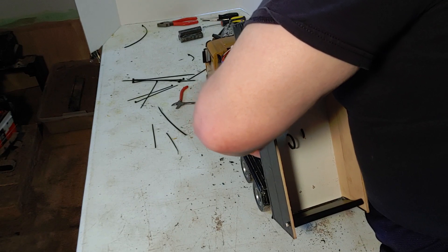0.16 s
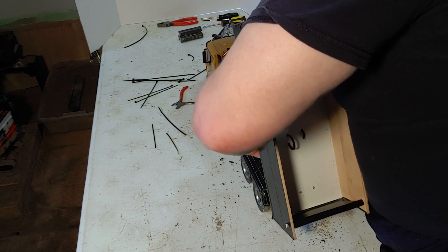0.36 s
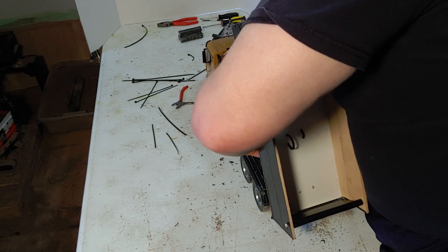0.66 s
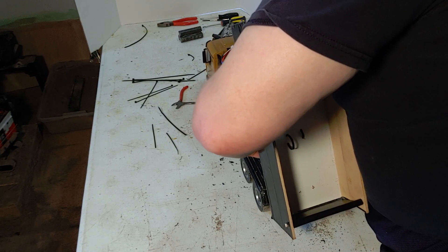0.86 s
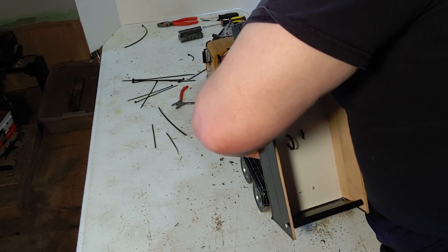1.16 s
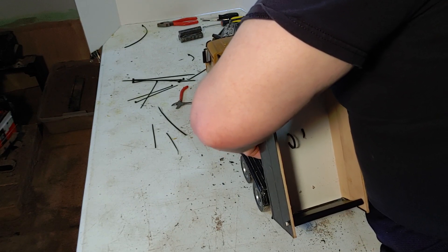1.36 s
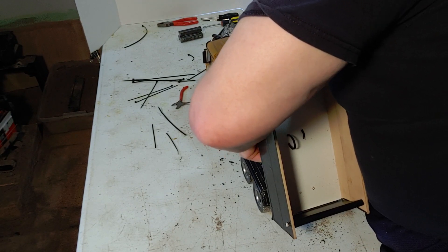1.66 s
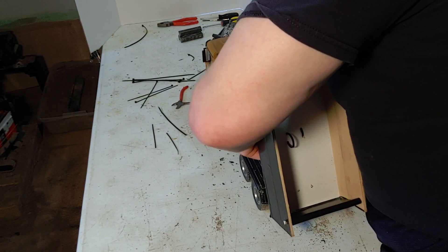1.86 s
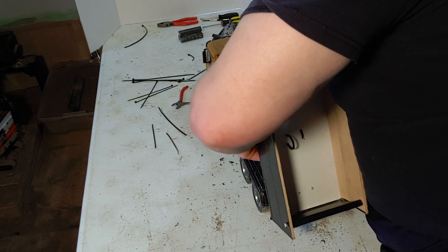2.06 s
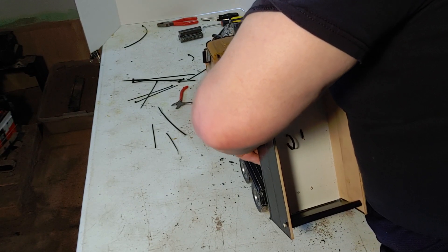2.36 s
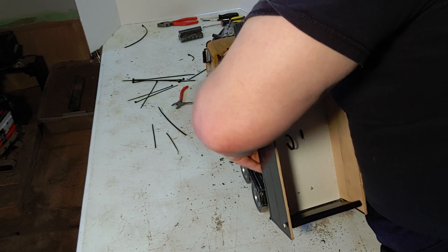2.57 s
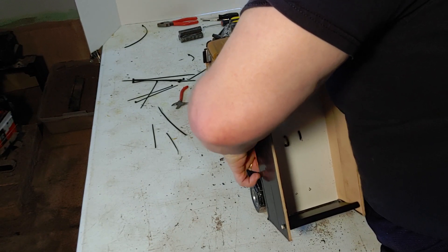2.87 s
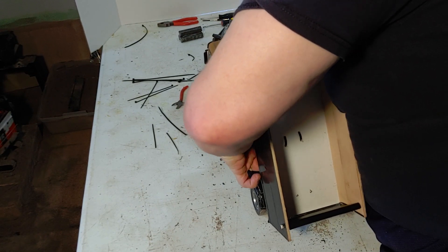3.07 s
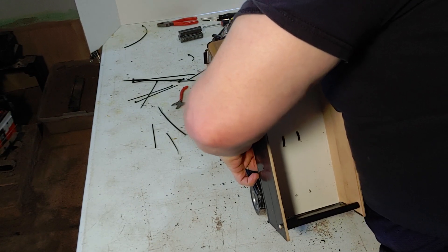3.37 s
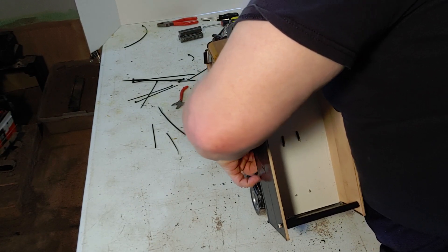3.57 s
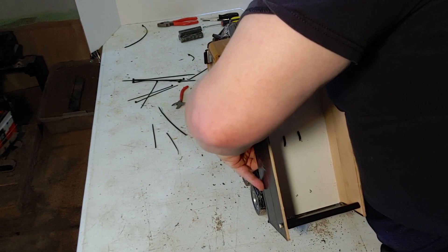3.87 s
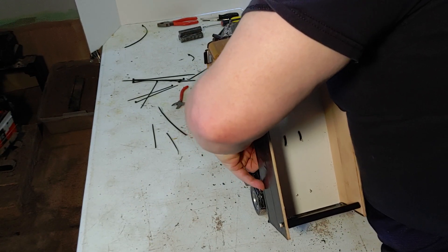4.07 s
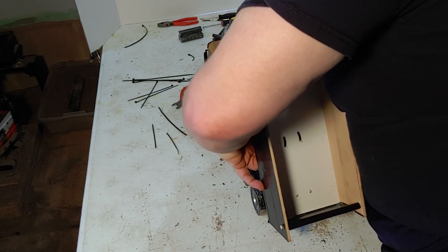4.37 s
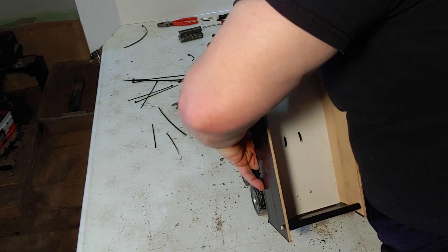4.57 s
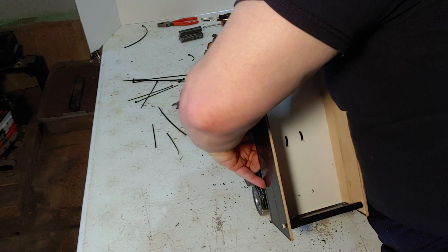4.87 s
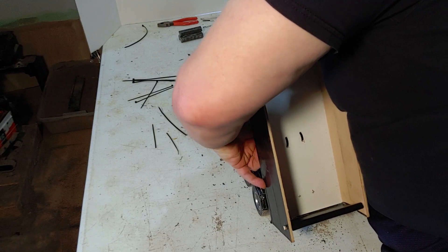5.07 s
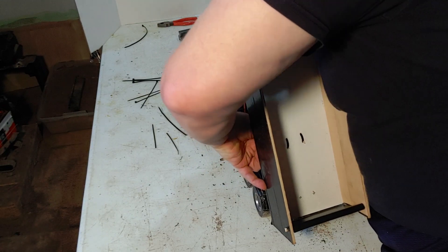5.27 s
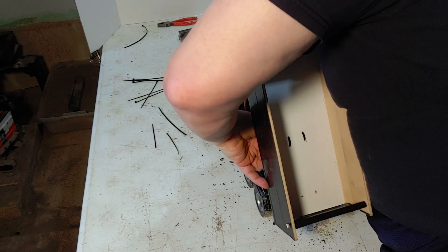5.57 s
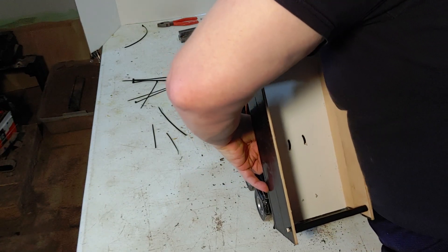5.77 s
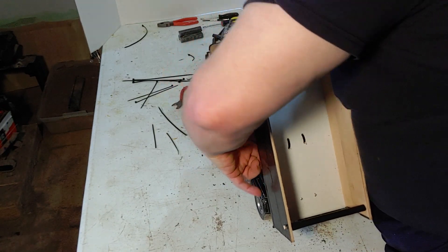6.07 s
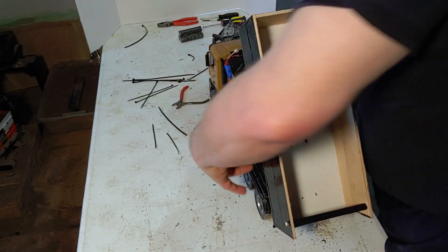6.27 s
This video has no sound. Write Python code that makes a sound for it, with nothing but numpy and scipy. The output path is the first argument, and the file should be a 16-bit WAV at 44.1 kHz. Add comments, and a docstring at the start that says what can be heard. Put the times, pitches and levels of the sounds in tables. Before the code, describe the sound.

Right at the start a nylon zip tie is yanked tight with a very short, bright zip, followed by two sharp plastic clicks. More clicks at about 0.8 seconds lead into a slower, hissing pull that ratchets tooth by tooth until 1.25 seconds. Plastic toy truck parts click and knock from 1.4 to 1.8 seconds, then fingers rub faintly. At about 2.9 seconds a second fast yank ends in a brief, rough squeak that rises and falls, with a soft thump from the workbench. After that there is only handling: a cluster of clicks and a scrape around 3.7 seconds, light knocks between 4.2 and 5 seconds, another small rattle near 5.4 seconds and a faint tick at 6 seconds. Everything sounds close and crisp, in a small, quiet room with little echo.

```python
"""A fast zip: a nylon tie is yanked tight on a toy truck on a workbench, its pawl snapping over the teeth.
A slow, hissing pull follows, then a second yank that ends in a stick-slip squeak.
Throughout, plastic parts click, fingers rub and the bench top thumps softly.
A small room answers; the microphone ports ring in the treble and a limiter holds the peaks."""
import sys
import numpy as np
from scipy import signal
from scipy.fft import rfft, irfft, next_fast_len
from scipy.io import wavfile
from scipy.ndimage import uniform_filter1d, minimum_filter1d, map_coordinates

SR = 44100
rng = np.random.default_rng(int(sys.argv[2]) if len(sys.argv) > 2 else 0)


def store_wav(level_fs):
    """Save 16-bit WAV to argv[1]."""
    pcm = np.round(np.clip(np.atleast_2d(level_fs), -1, 1) * 32767)
    wavfile.write(sys.argv[1], SR, pcm.T.astype(np.int16))


N = 282681

# two yanks, each a list of (time [s], speed [teeth/s], tooth level [dB])
YANKS = [
    [(0, 305, -16.5), (.02, 320, -14), (.04, 330, -21.5), (.075, 205, -27.5)],
    [(2.855, 222, -13.5), (2.88, 260, -15.5), (2.9, 344, -24.5), (2.93, 450, -24), (2.957, 400, -26.5),
     (2.975, 250, -41), (3.01, 130, -40)],
]
# truck body modes (frequency [Hz], width [Hz], gain [dB])
TRUCK_MODES = [(457, 27, 2.5), (532, 130, 2.5), (700, 120, -3), (846, 70, -4), (933, 28, -4),
               (1407, 270, -4.5), (1687, 220, -4), (2086, 230, -4.5), (2820, 140, -6.5), (3700, 220, -9.5)]
# truck shifts its weight on the bench (middle [s], length [s], sway [dB], thud [dB])
LOAD_SHIFTS = [(0.02, .1, -71, -47.5), (.35, 0.18, -57, -66.5), (1.09, 0.17, -85, -50.5),
               (1.23, 0.19, -55, -62.5), (1.96, 0.27, -63, -65.5), (2.96, 0.099, -61.5, -45),
               (3.05, 0.16, -50, -45), (3.84, 0.082, -60.5, -59.5), (4.43, 0.064, -63, -55),
               (4.76, .11, -47, -55), (4.95, 0.11, -60.5, -70), (5.44, 0.14, -62, -48),
               (5.58, 0.12, -53, -70), (5.79, 0.1, -63.5, -53.5), (6.09, 0.24, -65.5, -69.5)]
# plastic parts click and knock (time [s], snap [dB], body [dB])
PART_CLICKS = [(0.109, -12.5, -26), (0.236, -11, -23), (0.6585, -55, -40), (0.8022, -33, -34),
               (0.8135, -17.5, -30.5), (0.875, -15, -32), (1.3853, -21.5, -20), (1.513, -22, -30),
               (1.6878, -24, -25.5), (1.7132, -21.5, -22), (1.7377, -20.5, -30.5), (1.7637, -19.5, -25),
               (1.817, -45, -31.5), (2.1042, -27, -50), (2.281, -42.5, -60), (3.6182, -40.5, -60),
               (3.647, -44.5, -68), (3.712, -29.5, -42.5), (3.7531, -20, -24.5), (3.8, -20.5, -30),
               (3.82, -47, -39), (4.1741, -58, -29.5), (4.242, -48, -52.5), (4.398, -93, -50),
               (4.693, -69.5, -42.5), (4.835, -55, -38), (4.9188, -61, -38), (4.987, -65, -44),
               (5.085, -71, -56), (5.3511, -29.5, -27.5), (5.3704, -34, -29), (5.3874, -30, -29),
               (5.6373, -42.5, -61), (5.9989, -34.5, -47), (6.375, -49.5, -71)]
# fingers and straps rub the parts (middle [s], length [s], scratch [dB], body [dB])
RUB_STROKES = [(0.4, 0.035, -61.5, -60.5), (0.48, 0.025, -61, -66), (0.555, 0.06, -70.5, -67),
               (0.795, 0.02, -56.5, -66), (1.1, 0.11, -39, -36.5), (1.98, 0.17, -65, -54.5),
               (2.115, 0.098, -49, -65.5), (2.275, 0.065, -56.5, -65.5), (2.335, 0.041, -50.5, -61.5),
               (2.426, 0.03, -65.5, -84), (2.55, 0.11, -58.5, -67), (2.65, 0.031, -73, -56.5),
               (2.76, 0.098, -64.5, -71.5), (2.85, 0.014, -47.5, -43), (3.05, 0.17, -68, -50),
               (3.467, 0.043, -74, -56.5), (3.58, 0.15, -68.5, -74.5), (3.728, 0.054, -42.5, -46.5),
               (4.0, 0.18, -69, -64.5), (4.109, 0.056, -48.5, -60.5), (4.253, 0.028, -64.5, -49),
               (4.8, 0.068, -61, -51), (4.89, 0.079, -52.5, -53.5), (5.298, 0.041, -75.5, -55),
               (5.373, 0.069, -40, -37), (5.59, 0.086, -63, -69), (5.767, 0.084, -57.5, -58),
               (6.02, 0.077, -46.5, -56), (6.37, 0.07, -66, -77.5)]
# slow pull, speeding up, then labouring (time [s], speed [teeth/s], tooth level [dB])
SLOW_TEETH = [(.913, 95, -19), (.95, 65, -18), (1.019, 126, -17.5), (1.033, 226, -17), (1.057, 97, -16),
              (1.089, 106, -14.5), (1.176, 41, -15), (1.219, 78, -17), (1.24, 20, -12)]
# strap squeaks as it bites (time [s], pitch [Hz], level [dB])
SQUEAK_TRACK = [(2.88, 320, -32.5), (2.897, 455.6, -10.5), (2.908, 486.4, -17.5), (2.925, 889.4, -14.5),
                (2.941, 1048, -24.5), (2.953, 893, -20), (2.977, 793.6, -34.5), (2.985, 483.5, -20.5),
                (3.01, 389, -34.5)]
# source spectra (frequency [Hz], density [dB])
PAWL_SPECTRUM = [(150, -52.5), (500, -25.5), (1200, -21.5), (2000, -11.5), (3500, -7), (5300, -1),
                 (7000, 4), (9000, -0.5), (11000, -10.5), (13000, -11.5), (16000, -14.5)]
SWAY_SPECTRUM = [(15, -17.5), (28, -10.5), (40, -14), (54, -2), (64, -7.5), (80, -17.5), (150, -29),
                 (400, -74.5), (2000, -120)]
THUD_SPECTRUM = [(60, -34), (95, -22), (130, -5), (175, 6), (230, 1), (290, -7.5), (450, -23.5),
                 (1500, -59.5), (5000, -110)]
SNAP_SPECTRUM = [(150, -53.5), (500, -24), (1200, -18.5), (2000, -10), (3500, -5), (5300, -1), (7000, 2.5),
                 (9000, -4.5), (11000, -13.5), (13000, -25.5), (16000, -34.5)]
SCRATCH_SPECTRUM = [(200, -47.5), (600, -21.5), (1300, -14.5), (2100, -9), (2800, -3.5), (4000, -3),
                    (6000, 1.5), (8000, 0.5), (10000, -11), (12000, -23), (16000, -41)]
DRAG_SPECTRUM = [(300, -37), (1200, -15.5), (2000, -6.5), (3500, -11), (5500, -5), (8000, 1), (11000, 4.5),
                 (13000, 1.5), (16000, -9.5)]
AIR_SPECTRUM = [(20, -0.5), (60, -2.5), (150, -11.5), (500, -17), (2000, -24.5), (8000, -31),
                (16000, -40.5)]
# room decay (frequency [Hz], t60 [s])
ROOM_T60 = [(100, 0.047), (220, 0.11), (530, 0.19), (1500, 0.21), (4000, 0.19), (8000, 0.17),
            (14000, 0.076)]
# left-right likeness of reflections (frequency [Hz], correlation [-])
STEREO_CORRELATION = [(100, 0.47), (700, 0.83), (1200, 0.21), (3000, 0.7), (7000, 0.029)]
# microphone port resonance, left and right (frequency [Hz], width [Hz], boost [dB])
MIC_PORTS = [(7840, 620, 14), (7510, 850, 12.5)]


def amp(db):
    return 10 ** (np.asarray(db) / 20)


def unit(x):
    return x / np.sqrt(np.mean(x ** 2) + 1e-20)


def along(points, hz):
    """(Hz, value) points on a log axis."""
    f, v = np.transpose(points)
    return np.interp(np.log(hz + 1), np.log(f + 1), v)


def gated_curves(rows):
    """A gate over the rows' time span, then each column per sample."""
    times_s, *columns = np.transpose(rows)
    t = np.arange(N) / SR
    gate = (t >= times_s[0]) & (t <= times_s[-1])
    return [gate] + [np.interp(t, times_s, column) for column in columns]


def stroke_gains(rows, edge):
    """Strokes rise and fade about their middles: one gain curve per level column."""
    t = np.arange(0, N, 100) / SR
    middle_s, length_s, *levels_db = np.transpose(rows)[:, :, None]
    shape = np.exp(-np.minimum(np.abs(2 * (t - middle_s) / length_s) ** edge, 20))
    return [np.interp(np.arange(N) / SR, t, np.linalg.norm(shape * amp(db), axis=0)) for db in levels_db]


def fft_filtered(x, response):
    n = x.shape[-1]
    size = next_fast_len(n + n // 4)
    return irfft(rfft(x, size) * response(np.fft.rfftfreq(size, 1 / SR)), size)[..., :n]


def convolved(x, response, size=4096):
    impulse = irfft(response(np.fft.rfftfreq(size, 1 / SR))).ravel()
    return signal.oaconvolve(x, impulse)[:N]


def causal_response(spectrum, size=2048):
    """Minimum-phase response with this spectrum."""
    grid_hz = np.fft.rfftfreq(size, 1 / SR)
    cepstrum = irfft(np.log(amp(along(spectrum, grid_hz))))
    phase = rfft(2 * cepstrum[:size // 2], size).imag
    return lambda hz: amp(along(spectrum, hz)) * np.exp(1j * np.interp(hz, grid_hz, phase))


def spectrum_noise(spectrum, size=8192):
    return unit(convolved(rng.standard_normal(N), causal_response(spectrum, size), size))


def impacts(times_s, levels_db, response, t60_s, crackle=0.2, size=2048):
    """Impulse plus short crackle through a response; each has the energy of 4 ms at its level."""
    t = np.arange(size) / SR
    force = (t == 0) + crackle * rng.standard_normal((len(times_s), size)) * amp(-60 * t / t60_s)
    bursts = irfft(rfft(force) * response(np.fft.rfftfreq(size, 1 / SR)))
    bursts *= np.sqrt(.004 * SR) / np.linalg.norm(bursts, axis=1, keepdims=True)
    at = np.round(np.maximum(times_s, 0) * SR).astype(int)[:, None] + np.arange(size)
    return np.bincount(at.ravel(), (bursts * amp(levels_db)[:, None]).ravel(), N)[:N]


def truck(hz, contacts=1, vary_db=2, vary_pitch=0.035, low_hz=440, top_hz=6000):
    """Body response; each contact point excites the modes a little differently."""
    chance = rng.standard_normal((contacts, len(TRUCK_MODES), 2))
    peak = lambda f0, width: 1j * hz * width / (f0 ** 2 - hz ** 2 + 1j * hz * width)
    modes = 0
    for k, (centre_hz, width_hz, db) in enumerate(TRUCK_MODES):
        mode_hz = centre_hz * (1 + vary_pitch * chance[:, k, 1:])
        modes += amp(db + vary_db * chance[:, k, :1]) * peak(mode_hz, width_hz)
    bass_cut = peak(low_hz, low_hz) * 1j * hz / low_hz  # too small to radiate bass
    return modes * bass_cut / (1 + 1j * hz / top_hz) ** 3  # too heavy to follow treble


def ratchet(pull, jitter_s, scatter_db, body_db):
    """Teeth pass at strap speed; each snaps the pawl and shakes the truck."""
    gate, teeth_per_s, tooth_db = gated_curves(pull)
    teeth_passed = np.ceil(np.cumsum(gate * teeth_per_s) / SR)
    at = np.flatnonzero(np.diff(teeth_passed, prepend=0))
    chance = rng.standard_normal((len(at), 2))
    times_s = at / SR + jitter_s * chance[:, 0]
    levels_db = tooth_db[at] + scatter_db * chance[:, 1]
    pawl = impacts(times_s, levels_db, causal_response(PAWL_SPECTRUM), t60_s=0.0057)
    body = impacts(times_s, levels_db + body_db, lambda hz: truck(hz, contacts=len(at)), t60_s=0.0044)
    return pawl + body


def fast_zips():
    """In a yank the tooth snaps merge into a zip."""
    return sum(ratchet(pull, jitter_s=.0003, scatter_db=3.5, body_db=-12.5) for pull in YANKS)


def bench(knock_db=-28.5, knock_t60_s=0.33):
    """The top sways on its lowest mode and thuds as the load shifts; each knock also thuds it."""
    sway, shift_thud = stroke_gains(LOAD_SHIFTS, edge=1.4)
    times_s, _, body_db = np.transpose(PART_CLICKS)
    blows = np.bincount(np.round(times_s * SR).astype(int), amp(body_db + knock_db) ** 2, N)[:N]
    power_decay = amp(-60 / (knock_t60_s * SR)) ** 2
    knock_power = signal.lfilter([1], [1, -power_decay], blows)
    thud = np.sqrt(shift_thud ** 2 + knock_power)
    return sway * spectrum_noise(SWAY_SPECTRUM) + thud * spectrum_noise(THUD_SPECTRUM)


def part_clicks(rows, ref_reach_hz=3800, ref_snap_db=-33, db_per_octave=18):
    """Plastic contacts snap and knock the body; a harder snap reaches higher modes."""
    times_s, snap_db, body_db = np.transpose(rows)
    reach_hz = ref_reach_hz * 2 ** ((snap_db[:, None] - ref_snap_db) / db_per_octave)
    body = lambda hz: truck(hz, contacts=len(rows), vary_db=3.5, vary_pitch=.05, top_hz=reach_hz)
    snaps = impacts(times_s, snap_db, causal_response(SNAP_SPECTRUM), t60_s=0.012, crackle=0.21)
    knocks = impacts(times_s, body_db, body, t60_s=.008, crackle=0.27)
    return snaps + knocks


def micro_slips(rate_hz, spread_db):
    """Tiny friction impulses, random in time and size."""
    at = np.flatnonzero(rng.random(N) < rate_hz / SR)
    chance = rng.standard_normal((len(at), 2))
    return np.bincount(at, np.sign(chance[:, 0]) * amp(spread_db * np.clip(chance[:, 1], -2, 2)), N)


def rubbing(pressure_db=1.5, pressure_hz=30, catch_db=9, finger_reach_hz=2936):
    """Slips and harder catches under unsteady pressure scratch the surface and murmur in the body."""
    scratch_gain, body_gain = stroke_gains(RUB_STROKES, edge=4.7)
    catches = amp(catch_db) * micro_slips(rate_hz=70, spread_db=1)
    surface = causal_response(SCRATCH_SPECTRUM)
    scratch = unit(convolved(micro_slips(rate_hz=810, spread_db=6) + catches, surface))
    soft_touch = lambda hz: truck(hz, vary_db=1.2, top_hz=finger_reach_hz)
    body = unit(convolved(micro_slips(rate_hz=350, spread_db=4) + catches, soft_touch))
    knots = rng.standard_normal(int(N * pressure_hz / SR) + 4)
    pressure = map_coordinates(knots, [np.arange(N) * pressure_hz / SR])
    return amp(pressure_db * pressure) * (scratch_gain * scratch + body_gain * body)


def contact_drift(x, depth_db, bins=7, frames=9):
    """The colour drifts as the contact point moves."""
    spectra = signal.stft(x, nperseg=512)[2]
    field = uniform_filter1d(rng.standard_normal(spectra.shape), bins, axis=0)
    field = unit(uniform_filter1d(field, frames, axis=1))
    return signal.istft(spectra * unit(amp(depth_db * field)), nperseg=512)[1][:N]


def slow_zip(drag_db=-15.5, ref_teeth_per_s=110, db_per_doubling=5):
    """The strap creeps through its head tooth by tooth; harder, faster drag hisses louder."""
    gate, teeth_per_s, tooth_db = gated_curves(SLOW_TEETH)
    hiss_db = tooth_db + drag_db + db_per_doubling * np.log2(teeth_per_s / ref_teeth_per_s)
    hiss = unit(convolved(micro_slips(rate_hz=4300, spread_db=-2.5), causal_response(DRAG_SPECTRUM)))
    teeth = ratchet(SLOW_TEETH, jitter_s=.0002, scatter_db=3, body_db=-18)
    return teeth + gate * amp(hiss_db) * hiss


def squeak(pitch_jitter=.03, peak_db_per_octave=-6, harmonics=6):
    """Nylon sticks and slips under rising tension: a rough tone with falling overtones."""
    gate, pitch_hz, level_db = gated_curves(SQUEAK_TRACK)
    flutter = unit(uniform_filter1d(rng.standard_normal(N), size=90))
    phase = 2 * np.pi * np.cumsum(pitch_hz * (1 + pitch_jitter * flutter)) / SR
    # faster slip: sharper release, stronger overtones
    db_per_octave = peak_db_per_octave / np.sqrt(pitch_hz / pitch_hz.max())
    tone = sum(amp(db_per_octave * np.log2(k)) * np.sin(k * phase) for k in range(1, harmonics + 1))
    return gate * amp(level_db) * tone


def diffuse_pair(n):
    """Left and right noise, partly alike in bass and mids, unrelated in the top treble."""
    angle = lambda hz: np.arccos(np.clip(along(STEREO_CORRELATION, hz), -1, 1)) / 2
    weights = lambda hz: np.array([np.cos(angle(hz)), np.sin(angle(hz))])
    mid, side = fft_filtered(rng.standard_normal((2, n)), weights)
    return np.array([mid + side, mid - side])


def small_room(x, near_db, tail_db, near_t60_s, direct_db=-5, right_lag_samples=3):
    """Direct sound, left port first; near scatter off truck and bench; then the room's tail."""
    n = SR // 3
    t = np.arange(n) / SR
    hz, frame_s, spectra = signal.stft(diffuse_pair(n), SR, nperseg=256)
    decay = amp(-60 * frame_s / along(ROOM_T60, hz)[:, None])
    tail = signal.istft(spectra * decay, SR, nperseg=256)[1][:, :n] * (1 - np.exp(-t / 0.0059))
    near = diffuse_pair(n) * amp(-np.minimum(60 * t / near_t60_s, 200)) * (1 - np.exp(-t / 0.00055))
    scaled = lambda part, db: amp(db) * part / np.linalg.norm(part, axis=1, keepdims=True)
    impulse = scaled(near, near_db) + scaled(tail, tail_db)
    impulse[:, 0] += amp(direct_db)
    left, right = signal.oaconvolve(x[None], impulse, axes=1)[:, :N]
    return np.array([left, np.pad(right, (right_lag_samples, 0))[:N]])


def scene(click_spots=4, pan_db=0.4, air_db=-72):
    """Ties, parts and hands in the room, over bench and air; each click spot has its own reflections."""
    zips = contact_drift(slow_zip(), depth_db=1) + fast_zips()
    ties = small_room(zips + squeak(), near_db=-2, tail_db=-5.5, near_t60_s=0.014)
    spots = (part_clicks(PART_CLICKS[k::click_spots]) for k in range(click_spots))
    parts = sum(small_room(spot, near_db=-2.5, tail_db=-4, near_t60_s=0.026) for spot in spots)
    hands = small_room(contact_drift(rubbing(), depth_db=4), near_db=0, tail_db=-9.5, near_t60_s=0.1)
    air = amp(air_db) * np.array([spectrum_noise(AIR_SPECTRUM), spectrum_noise(AIR_SPECTRUM)])
    return (ties + parts + hands) * amp([[-pan_db], [pan_db]]) + bench() + air


def record(dry, limit_db=-1.5, cutoff_hz=16000):
    """Microphone ports ring, a limiter ducks the peaks, a steep low-pass ends the band."""
    channels = []
    for side, (centre_hz, width_hz, boost_db) in zip(dry, MIC_PORTS):
        port = signal.lfilter(*signal.iirpeak(centre_hz, centre_hz / width_hz, SR), side)
        channels.append(side + (amp(boost_db) - 1) * port)
    x = np.array(channels)
    needed_gain = np.minimum(1, amp(limit_db) / (np.abs(x).max(axis=0) + 1e-9))
    gain = uniform_filter1d(minimum_filter1d(needed_gain, size=40), size=30)
    return fft_filtered(x * gain, lambda hz: 1 / (1 + (hz / cutoff_hz) ** 160))


dry = scene()
out = record(dry)
store_wav(out)
```